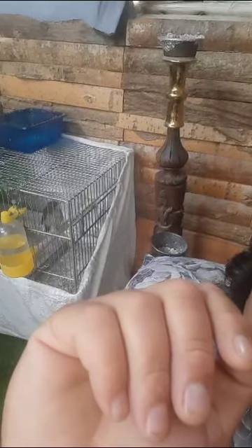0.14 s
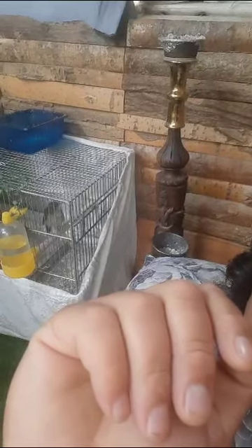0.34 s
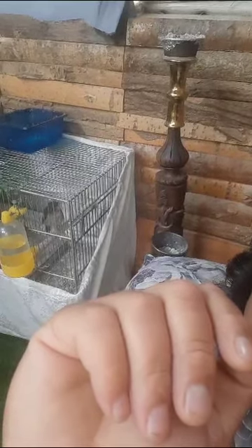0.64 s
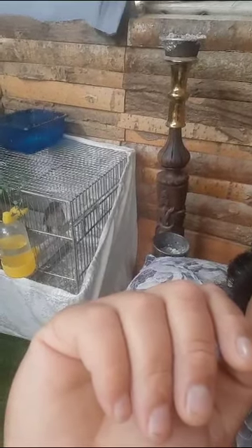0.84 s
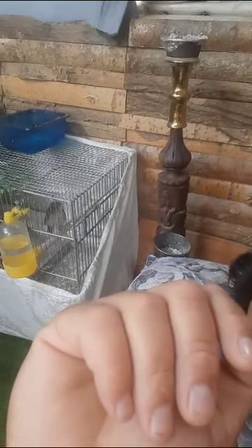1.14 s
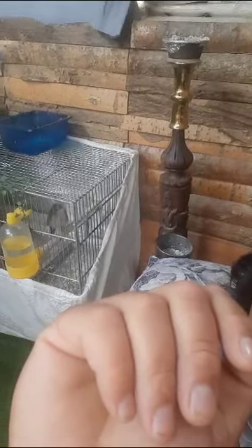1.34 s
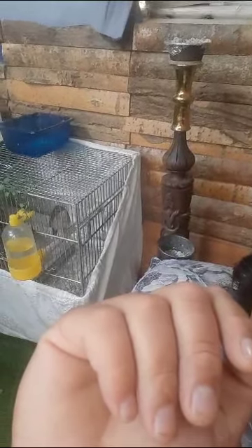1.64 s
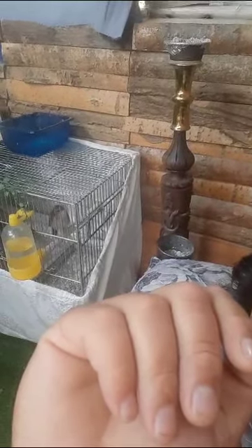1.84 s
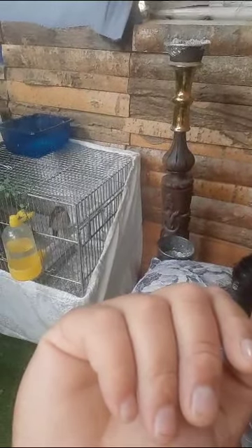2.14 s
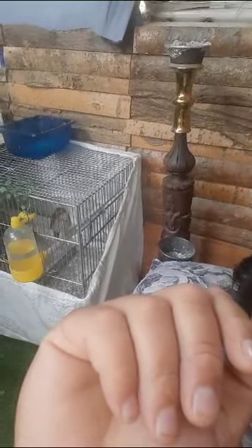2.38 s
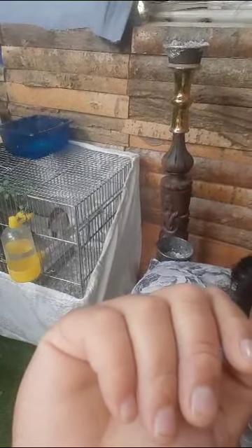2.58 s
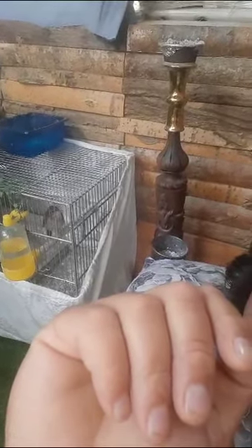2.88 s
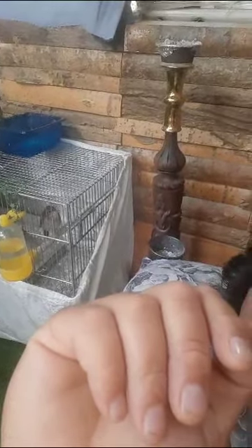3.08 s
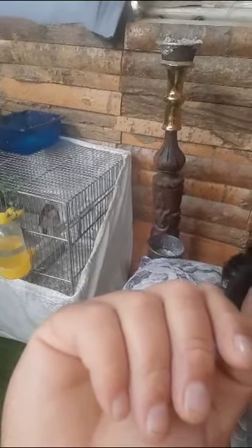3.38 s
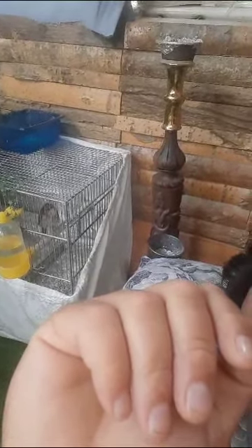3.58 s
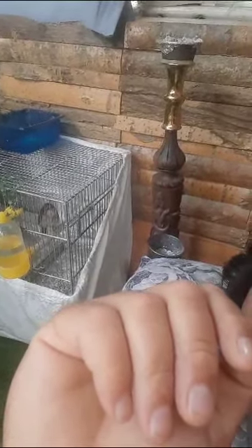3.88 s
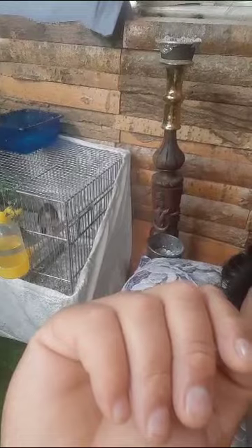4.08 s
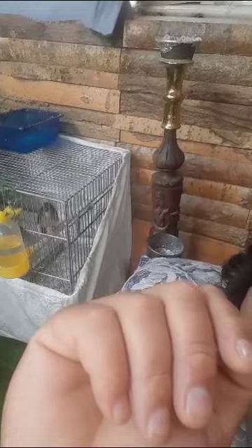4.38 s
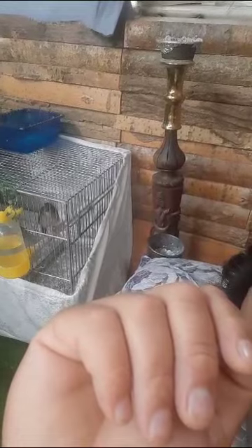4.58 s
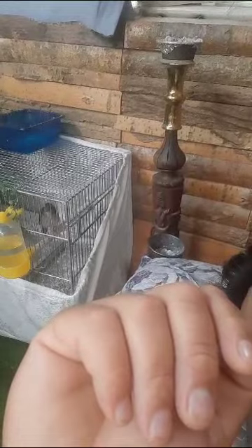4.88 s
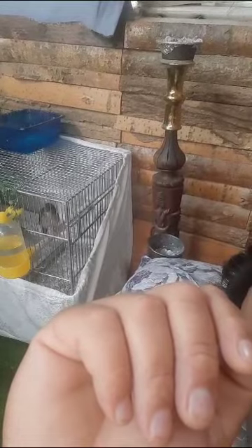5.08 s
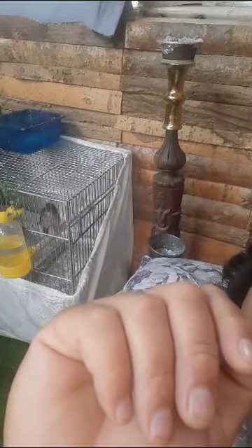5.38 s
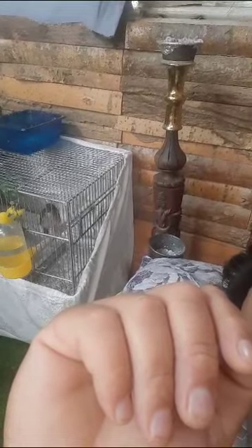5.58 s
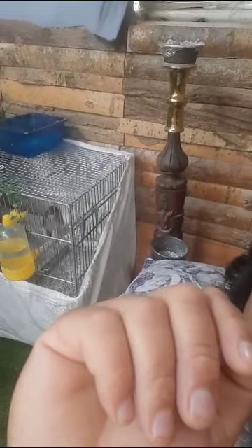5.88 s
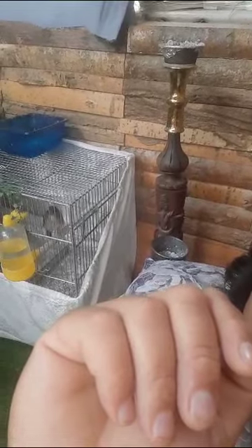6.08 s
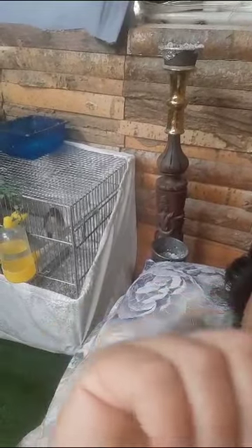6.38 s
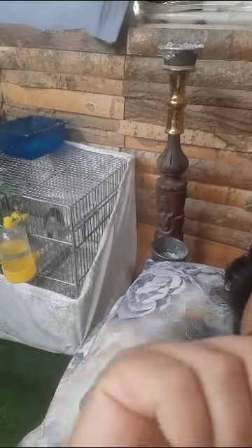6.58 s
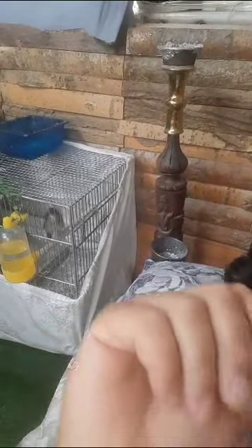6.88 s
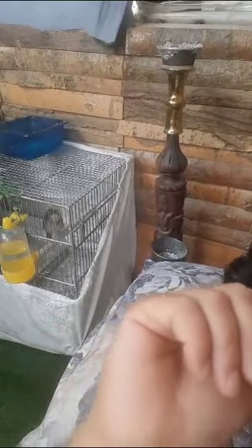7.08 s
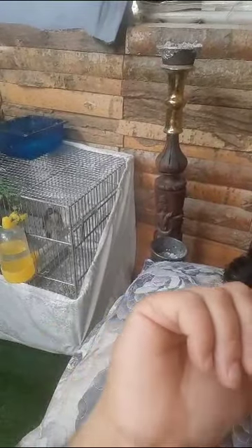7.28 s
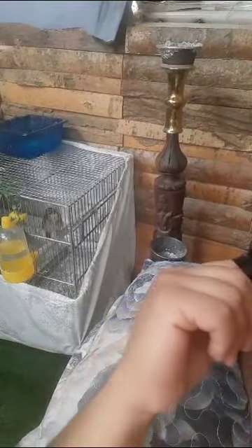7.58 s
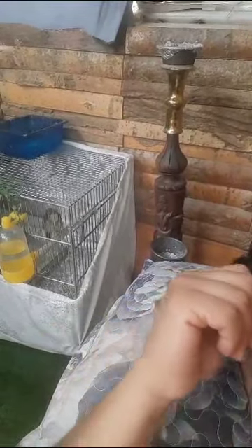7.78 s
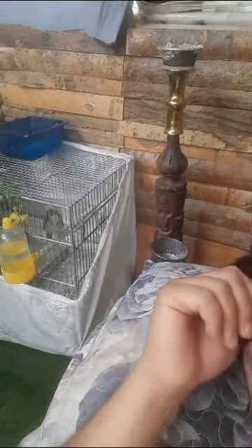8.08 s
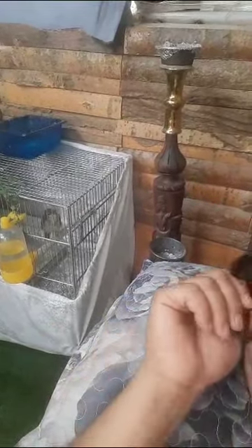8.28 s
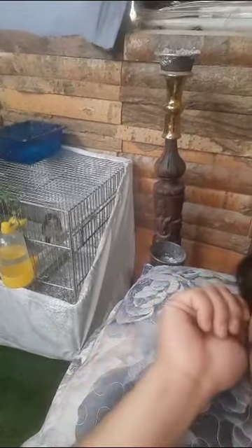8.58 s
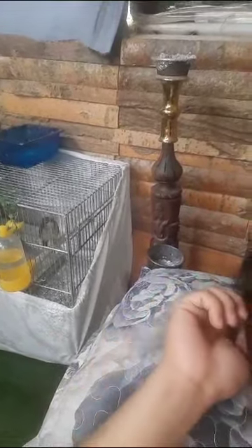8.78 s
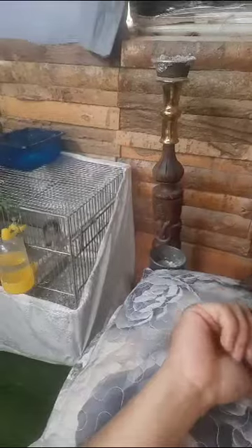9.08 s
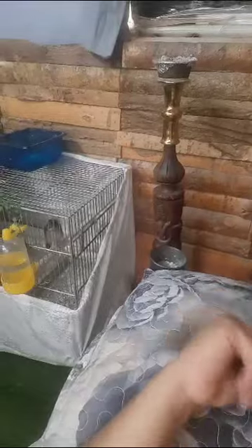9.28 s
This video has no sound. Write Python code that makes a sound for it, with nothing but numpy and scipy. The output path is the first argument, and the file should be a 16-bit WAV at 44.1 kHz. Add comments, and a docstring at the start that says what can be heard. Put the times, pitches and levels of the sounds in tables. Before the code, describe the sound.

One small caged bird sings close by in a wood-panelled room. Ten sharp, very high tsiks come first, then quick swoops and faint buzzes, alternating high and low see-saw whistles, and three thin sinking whistles. Loud swoops and rasping buzzes with downward flicks close the song, ending with one piercing slur. A few light cage ticks, soft air noise and a faint wavering hum lie beneath. Stereo handheld microphone, short reverberation.

```python
"""A caged songbird sings tsiks, swoops, slurs, see-saw notes, long whistles and buzzes.
Each note is a frequency-modulated near sine with overtones; a tsik sounds two such voices at once.
The cage ticks a few times in short bursts of band-passed noise.
Close reflections and a dense decaying tail, as of a small wood-panelled room, smear every note.
Behind it a distant machine hums in wavering sines, over soft shaped noise."""
import sys
import numpy as np
from scipy import signal
from scipy.fft import rfft, irfft
from scipy.io import wavfile

SR = 44100
rng = np.random.default_rng(int(sys.argv[2]) if len(sys.argv) > 2 else 0)


def log_audio(samples):
    """Write samples as a 16-bit WAV file to the path given in sys.argv[1]."""
    # one column per channel
    frames = np.atleast_2d(samples).T
    # limit to full scale, then quantise
    limited = np.clip(frames, -1, 1)
    pcm = np.round(limited * 32767).astype(np.int16)
    wavfile.write(sys.argv[1], SR, pcm)


N = 416304  # length in samples


def amp(db):
    """Level law: decibels to amplitude gain."""
    return 10 ** (np.asarray(db) / 20)


def evened(x):
    """Normalization: scales a signal to unit rms."""
    return x / np.sqrt(np.mean(x ** 2) + 1e-20)


def read(points, hz):
    """Spectral interpolation: reads a table on a log-frequency axis."""
    f, value = np.transpose(points)
    return np.interp(np.log(hz + 1), np.log(f + 1), value)


def add(mix, s, sound):
    """Superposition: sums a sound into the mix at time s, cutting what lies outside."""
    at = round(s * SR)
    sound = sound[max(-at, 0):]
    part = mix[max(at, 0):][:len(sound)]
    part += sound[:len(part)]


def drift(t, rate, count=20):
    """Random modulation: unit-rms sum of sines with chance frequencies from 0 to rate in Hz."""
    speed, phase = rng.random((2, count, 1))
    return evened(np.sin(2 * np.pi * (rate * speed * t + phase)).sum(0))


def progress(length):
    """Normalized time: time through a note in seconds, and from 0 to 1."""
    t = np.arange(0, length, 1 / SR)
    return t, t / length


def swell(u, peak, rise_db, fall_db, curve=1.57):
    """Amplitude envelope: relative level in dB that rises to 0 at the peak and sinks again."""
    peak = np.clip(peak, .05, .95)
    before = np.maximum(1 - u / peak, 0)
    after = np.maximum((u - peak) / (1 - peak), 0)
    return -rise_db * before ** curve - fall_db * after ** curve


def warble(t, rate, first_crest=0.0082, cusp=0.29, skew=0.26, stumble=.3):
    """Periodic modulation: second harmonics point the crests, round the troughs and hasten the rise."""
    swing = 2 * np.pi * rate * (t - first_crest) + stumble * drift(t, 40)
    return np.cos(swing) + cusp * np.cos(2 * swing) - skew * np.sin(2 * swing)


# strength of the whistle's overtones by where they fall, before effort and rolloff: (f/Hz, relative level/dB)
WHISTLE_OVERTONES = [(3000, -30), (5200, -40.5), (7500, -39), (11000, -39.5), (12800, -30.5),
                     (14500, -47.5), (16000, -46.5)]


def whistle(hz, db, edge, strain_db, rolloff=0.52, jitter=.002, bloom=0.17):
    """Harmonic source, one side of the syrinx: a near sine with fuzzy overtones scaled by level and strain."""
    t = np.arange(len(hz)) / SR
    phase = 2 * np.pi * np.cumsum(hz * (1 + jitter * drift(t, 330))) / SR
    unsteady = phase + .18 * drift(t, 550)  # radians
    effort = amp(bloom * (db + 19.0) + strain_db)  # bloom: overtone dB per dB of level
    overtones = 0
    for k in range(2, 9):
        strength = amp(read(WHISTLE_OVERTONES, k * hz)) / k ** rolloff
        below_nyquist = k * hz < SR / 2
        overtones = overtones + strength * np.sin(k * unsteady) * below_nyquist
    from_ends = np.minimum(t, t[-1] - t)
    gate = np.sin(np.pi / 2 * np.clip(from_ends / edge, 0, 1)) ** 2  # edge in s
    return np.sqrt(2) * amp(db) * gate * (np.sin(phase) + effort * overtones)


# sharp two-voiced tsiks; the levels are bases that each voice's envelope shapes:
# (plunge t/s, upper voice reference f/Hz, upper voice level/dB, plunge length t/s, plunge level/dB,
#  linger: over 1 hangs at the top and fades more)
TSIK_NOTES = [(.001, 14600, -31.5, 0.0096, -19.5, 1.24), (.151, 14500, -30.5, .012, -16, 1.16),
              (0.347, 15200, -25, 0.0081, -15.5, 2.1), (.53, 15500, -19, 0.0094, -11, 2.77),
              (.690, 15100, -22.5, 0.0099, -12.5, 1.75), (.84, 15300, -19, 0.00818, -8, 2.6),
              (1.003, 15300, -23.5, .009, -17, 1.76), (1.176, 14940, -26, 0.012, -27.5, 1.4),
              (1.352, 15300, -25.5, 0.014, -23, 2.1), (1.552, 14240, -36.5, 0.013, -24, 2.18)]


def tsiks(fade_db=7, rasp_db=2.5, bite=0.0037):
    """Two-source superposition: one voice arches very high as the other plunges, rasping, through the treble."""
    out = np.zeros(N)
    lead_s, top_hz, foot_hz = .023, 7616, 2920
    for s, crest_hz, crest_db, length, plunge_db, linger in TSIK_NOTES:
        t = np.arange(-lead_s, length, 1 / SR)
        knees = [-lead_s, -lead_s * .5, -lead_s * 0.22, length * 0.33, length]
        upper_hz = crest_hz * np.interp(t, knees, [.84, .99, 1.005, 0.9, 0.53])
        upper_db = crest_db + np.interp(t, knees, [-29, -7, 3.5, -1, -12])
        add(out, s - lead_s, whistle(upper_hz, upper_db, edge=0.0028, strain_db=4.5, jitter=0.01))

        t, u = progress(length)
        fall = u ** linger
        lower_hz = top_hz * (foot_hz / top_hz) ** fall
        lower_db = plunge_db - fade_db * fall * linger + rasp_db * drift(t, 1200)
        add(out, s, whistle(lower_hz, lower_db, edge=bite, strain_db=11, jitter=0.017))
    return out


# swoops, a fall, a pause and a rebound that levels off:
# (t/s, fall t/s, top f/Hz, foot f/Hz, bend: over 1 hangs at the top, fall peak level/dB,
#  pause t/s, rebound t/s, rebound target f/Hz, rebound peak level/dB)
SWOOP_NOTES = [(1.719, 0.048, 2600, 1376, 0.9, -28, 0.033, 0.038, 2054, -22.5),
               (1.966, .028, 5300, 2690, 0.44, -23.5, 0.016, 0.036, 2712, -29),
               (2.133, 0.045, 5890, 3070, 0.61, -23, 0.0055, 0.052, 2856, -31.5),
               (4.152, 0.02, 3300, 2180, 0.47, -19, .002, 0.053, 2347, -16),
               (4.248, 0.02, 3376, 2205, 0.45, -15.5, .002, 0.048, 2344, -15.5),
               (4.35, 0.028, 3083, 2014, .65, -17, 0.0029, 0.041, 2372, -21),
               (6.753, .050, 2265, 1397, 3.5, -14, 0.026, 0.067, 1819, -14),
               (6.99, 0.038, 3390, 1580, 0.92, -12, 0.0044, 0.057, 2438, -15),
               (7.193, 0.034, 3590, 1480, 1.34, -12.5, 0.014, 0.056, 2672, -12),
               (7.414, 0.037, 3247, 1696, 1.7, -12, 0.0082, 0.05, 2653, -13.5)]


def swoops(loudest_drop=0.29):
    """Frequency glide and exponential relaxation: the pitch plunges, pauses and springs toward a held note."""
    out = np.zeros(N)
    rebound_time_constant_s = .016
    for s, fall_s, top_hz, foot_hz, bend, fall_db, pause_s, rebound_s, rebound_hz, rebound_db in SWOOP_NOTES:
        t, u = progress(fall_s)
        hz = top_hz + (foot_hz - top_hz) * u ** bend
        peak = loudest_drop ** (1 / bend)  # loudest part of the way down
        level_db = fall_db + swell(u, peak, rise_db=7.5 + 5 * bend, fall_db=4)
        add(out, s, whistle(hz, level_db, edge=0.0032, strain_db=0, rolloff=.1, bloom=0.33))

        t, u = progress(rebound_s)
        hz = rebound_hz + (foot_hz - rebound_hz) * np.exp(-t / rebound_time_constant_s)
        level_db = rebound_db + swell(u, peak=.68, rise_db=9, fall_db=4.5)
        rebound = whistle(hz, level_db, edge=.005, strain_db=-3, rolloff=-.2, bloom=0.28)
        add(out, s + fall_s + pause_s, rebound)
    return out


# short downward flicks: (t/s, length t/s, top f/Hz, foot f/Hz, starting level/dB)
FLICK_NOTES = [(2.303, .026, 1750, 1070, -37), (7.736, 0.018, 3060, 1490, -14),
               (7.938, .021, 2780, 1236, -20), (8.159, .011, 2630, 1185, -23),
               (8.379, 0.013, 2665, 1350, -20)]


def flicks(bend=.9, fade_db=9):
    """Downward chirp: a quick, nearly straight drop in pitch that fades as it falls."""
    out = np.zeros(N)
    for s, length, top_hz, foot_hz, db in FLICK_NOTES:
        t, u = progress(length)
        hz = top_hz + (foot_hz - top_hz) * u ** bend
        add(out, s, whistle(hz, db - fade_db * u, edge=.002, strain_db=9))
    return out


# slurs that swell as they curl over and down: (t/s, length t/s, top f/Hz, end f/Hz, peak level/dB)
SLUR_NOTES = [(2.586, 0.076, 5650, 3730, -25.5), (8.457, 0.028, 7150, 6400, -8)]


def slurs(bend=2.0):
    """Curved chirp with a crescendo: a soft high start grows louder as it bends down."""
    out = np.zeros(N)
    for s, length, top_hz, end_hz, db in SLUR_NOTES:
        t, u = progress(length)
        hz = top_hz + (end_hz - top_hz) * u ** bend
        level_db = db + swell(u, peak=1.0, rise_db=33, fall_db=9.5)
        add(out, s, whistle(hz, level_db, edge=0.0041, strain_db=5))
    return out


# high see-saw notes, clean at first, then quivering, and low ones that quiver, then clear; columns of both:
# (t/s, length t/s, start f/Hz, end f/Hz, peak level/dB, peak as share of length, quiver scale f/Hz)
HIGH_SEESAW_NOTES = [(2.799, 0.13, 3175, 3560, -25.5, .75, 220), (3.187, 0.1, 3340, 3746, -24, .65, 240),
                     (3.582, .098, 3385, 3770, -17.5, .4, 160), (3.970, 0.11, 3266, 3756, -21.5, .45, 170)]
LOW_SEESAW_NOTES = [(2.993, 0.082, 1880, 1680, -30, .85, 450), (3.391, 0.086, 1612, 1803, -21, 0.52, 150),
                    (3.784, .068, 1590, 1690, -19.5, 1, 170)]


def seesaw(bend=1.7, quiver_growth=2.2, clearing=3, quiver_onset_s=0.026):
    """Frequency modulation of varying depth: high notes break into a quiver, alternate low ones lose theirs."""
    out = np.zeros(N)
    for rows, high in (HIGH_SEESAW_NOTES, True), (LOW_SEESAW_NOTES, False):
        for s, length, start_hz, end_hz, db, peak, depth_hz in rows:
            t, u = progress(length)
            if high:
                quiver = u ** quiver_growth
                shape_db = swell(u, peak, rise_db=25, fall_db=11.5)
            else:
                quiver = np.minimum(t / quiver_onset_s, 1) * (1 - u ** clearing)
                shape_db = swell(u, peak, rise_db=13, fall_db=2)
            glide_hz = start_hz + (end_hz - start_hz) * u ** bend
            hz = glide_hz + depth_hz * quiver * warble(t, rate=108, first_crest=.008)
            add(out, s, whistle(hz, db + shape_db, edge=0.0038, strain_db=2, rolloff=0.69))
    return out


# long whistles that sink and swell, each a curve before vibrato and flutter: (t/s, f/Hz, level/dB)
LONG_WHISTLE_CURVES = [
    [(5.09, 6050, -55.5), (5.21, 5430, -46), (5.30, 4930, -33), (5.36, 5050, -35), (5.405, 5260, -46.5)],
    [(5.65, 6005, -60), (5.82, 5460, -42), (5.885, 5473, -32), (5.962, 5358, -26.5)],
    [(6.233, 6460, -58.5), (6.32, 5493, -50.5), (6.48, 5070, -27), (6.575, 4815, -23), (6.61, 4630, -17),
     (6.655, 4460, -20.5), (6.672, 5900, -42)],
]


def long_whistles(vibrato_per_s=39, vibrato_hz=115, widen_db=0.97, bead_db=2.5, flutter_db=3.0, wander_hz=35):
    """Joint frequency and amplitude modulation: a vibrato widens with loudness and beads the level."""
    out = np.zeros(N)
    for curve in LONG_WHISTLE_CURVES:
        times, pitches, levels = np.transpose(curve)
        t, u = progress(times[-1] - times[0])
        hz = np.interp(times[0] + t, times, pitches)
        db = np.interp(times[0] + t, times, levels)
        vibrato = warble(t, vibrato_per_s, stumble=0.85)
        width_hz = vibrato_hz * amp(widen_db * (db - db.max()))
        hz = hz + width_hz * vibrato + wander_hz * drift(t, 21.92)
        level_db = db + bead_db * vibrato + flutter_db * drift(t, 70)
        add(out, times[0], whistle(hz, level_db, edge=0.0059, strain_db=15.5, rolloff=0.93, bloom=-.05))
    return out


# buzzes, from soft lisps to loud rasps; the level is a base that envelope and strokes shape:
# (t/s, length t/s, start f/Hz, end f/Hz, level/dB, initial warble scale f/Hz, warble rate f/Hz)
BUZZ_NOTES = [(1.93, 0.037, 4550, 6040, -36, 600, 71), (1.933, 0.02, 7440, 6850, -43, 500, 94),
              (2.115, 0.05, 6400, 6920, -39, 200, 112), (2.326, 0.056, 2510, 2710, -54.5, 250, 89),
              (2.34, 0.053, 1297, 1370, -47, 100, 121), (2.508, 0.058, 3300, 4210, -38, 333, 67.5),
              (4.488, 0.051, 6010, 6760, -40.5, 250, 112), (4.493, 0.028, 4200, 4260, -43.5, 1400, 149),
              (7.584, 0.091, 3717, 3766, -15, 418.5, 74), (7.791, .076, 3873, 3720, -12, 634, 101),
              (8.006, 0.063, 3930, 3956, -13, 660, 68), (8.224, 0.08, 3858, 3750, -21.5, 690, 69)]


def buzzes(settle=0.81, detune_db=25, stroke_db=1.5, bend=2.5):
    """Fast frequency modulation past a resonance: a narrowing warble, with the level raised on downstrokes."""
    out = np.zeros(N)
    for s, length, start_hz, end_hz, db, depth_hz, rate in BUZZ_NOTES:
        t, u = progress(length)
        hz = start_hz + (end_hz - start_hz) * u ** bend
        swing = warble(t, rate, first_crest=.008, skew=0.29)
        warble_hz = depth_hz * (1 - settle * u) * swing
        off_throat_db = detune_db * np.maximum(warble_hz, 0) / hz  # crests overshoot the throat's resonance
        upstroke_db = stroke_db * evened(np.gradient(swing))
        level_db = db + swell(u, peak=0.38, rise_db=10, fall_db=3) - off_throat_db - upstroke_db
        add(out, s, whistle(hz + warble_hz, level_db, edge=0.0029, strain_db=12, rolloff=0.93))
    return out


# light ticks of the cage: (t/s, level/dB before the decay, band centre f/Hz)
CAGE_TICKS = [(2.042, -35.5, 3240), (6.286, -57, 3000), (6.340, -51, 2700), (7.556, -40.5, 2960),
              (8.557, -48.5, 1200), (9.379, -53.5, 4000)]


def ticks(t60=0.062):
    """Impulsive noise with exponential decay: short, broad snaps of wire and perch."""
    out, t = np.zeros(N), np.arange(SR // 10) / SR
    for s, db, hz in CAGE_TICKS:
        b, a = signal.butter(1, [hz / 2, hz * 2], "band", fs=SR)
        snap = signal.lfilter(b, a, rng.standard_normal(len(t)))
        add(out, s, amp(db - 60 * t / t60) * evened(snap))
    return out


# reflections from nearby surfaces: (left delay t/s, right delay t/s, level/dB before a common trim)
WALL_REFLECTIONS = [(.0012, 0.001284, -10.5), (.0026, .00267, -14.5), (.0047, .0041, -13),
                    (.0074, .0081, -11), (.0096, .0102, -7.5), (0.0136, 0.016, -3.5)]
# reverberation time of the tail: (f/Hz, 60 dB decay t/s)
ROOM_DECAY = [(500, 0.11), (1800, 0.16), (3500, 0.19), (7000, 0.17), (15000, 0.13)]


def room(x, right_db=-0.43, build=0.013):
    """Impulse-response convolution: direct sound, close reflections and a short dense tail at each microphone."""
    direct_db, walls_db, tail_db = -4.5, -3.5, -5
    left_lag_s = .00032
    size = SR // 2
    signs = rng.choice([-1., 1.], (2, size))
    taps = signs * (rng.random((2, size)) < 4000 / SR)  # about 4000 echoes per s
    hz, t, z = signal.stft(taps, SR, nperseg=128)
    decay = amp(-60 * t / read(ROOM_DECAY, hz)[:, None])
    tail = signal.istft(z * decay * np.minimum(t / build, 1), SR, nperseg=128)[1]
    response = amp(tail_db) * tail / np.linalg.norm(tail, axis=1, keepdims=True)
    response[[0, 1], [round(left_lag_s * SR), 0]] += amp(direct_db)
    for left, right, db in WALL_REFLECTIONS:
        response[[0, 1], [round(left * SR), round(right * SR)]] += amp(db + walls_db)
    return signal.fftconvolve(x[None], response, axes=1)[:, :N] * amp([[0], [right_db]])


# hum of a distant machine: (f/Hz, rms waver f/Hz, base level/dB, full change/dB as the hum shifts)
HUM_TONES = [(93, 2, -57.5, -3.5), (146, 10, -63.5, 9.5), (298.8, 11, -56, -6.5), (327.4, 11, -59.5, -0.5),
             (428, 3.2, -72, 1), (504.6, 6, -64, -4), (591.5, 4.4, -61, -3), (674, 6.7, -70.5, 0.5),
             (925, 13, -68, -6)]
# course of the hum's shift: (t/s, share of the full change)
HUM_SHIFT_COURSE = [(7.9, 0.063), (8.6, 0.95)]


def hum(throb_db=3):
    """Additive synthesis with random modulation: low tones waver in pitch and level."""
    t, slow = np.arange(N) / SR, np.linspace(0, N / SR, 1000)
    shift = np.interp(slow, *np.transpose(HUM_SHIFT_COURSE))
    out = np.zeros((2, N))
    for hz, waver_hz, db, change_db in HUM_TONES:
        pitch = np.interp(t, slow, hz + waver_hz * drift(slow, 12))
        level = np.interp(t, slow, amp(db + change_db * shift + throb_db * drift(slow, 6)))
        lean = amp(read(STEREO_TILT, hz) * np.array([[.5], [-.5]]))
        out += lean * np.sqrt(2) * level * np.sin(2 * np.pi * np.cumsum(pitch) / SR)
    return out


# left-right correlation of the noise: (f/Hz, likeness from 0 to 1)
STEREO_LIKENESS = [(30, 0.8), (200, 0.94), (400, 0.27), (700, 0.043), (2000, 0.038), (15000, 0.07)]
# stereo lean of noise and hum: (f/Hz, left minus right level/dB)
STEREO_TILT = [(60, -2.5), (110, 5.5), (200, -4.5), (380, -2.5), (700, 4), (1290, 0.5), (2380, 0.5),
               (4400, -3.5), (8120, -6), (15000, 1)]


def stereo_noise(gain):
    """Partial coherence: shaped noise, nearly mono in the bass, leans left or right with the room's modes."""
    a, b = rfft(rng.standard_normal((2, N)))
    hz = np.fft.rfftfreq(N, 1 / SR)
    alike = np.clip(read(STEREO_LIKENESS, hz), -1, 1)
    lean = amp(read(STEREO_TILT, hz) / 2)
    left = a * lean
    right = (alike * a + np.sqrt(1 - alike ** 2) * b) / lean
    return evened(irfft(np.array([left, right]) * gain, N))


# spectrum of the soft room noise: (f/Hz, relative level/dB per Hz)
AIR_SPECTRUM = [(20, -22), (80, -12), (120, -16.5), (160, -13), (260, -17.5), (480, -16.5), (650, -17.5),
                (800, -26.5), (1300, -33.5), (1750, -33), (2500, -46), (4250, -52), (4520, -38.5),
                (4800, -48.5), (5700, -48), (6700, -43.5), (8100, -43), (8800, -50.5), (16000, -53)]
# course of the room noise: (t/s, level/dB before a common trim)
AIR_LEVEL = [(0, -47.5), (1.05, -48), (3.8, -45.5), (4.7, -49.5), (5.6, -50), (5.902, -47), (6.8, -45),
             (8.6, -52), (9.44, -50.5)]


def background(air_db=-2):
    """Spectrally shaped noise: soft room noise slowly swells and sinks."""
    level_db = np.interp(np.arange(N) / SR, *np.transpose(AIR_LEVEL))
    spectrum = amp(read(AIR_SPECTRUM, np.fft.rfftfreq(N, 1 / SR)))
    return amp(level_db + air_db) * stereo_noise(spectrum)


def scene():
    """Linear superposition: bird and cage in the room, over the noise and hum."""
    song = tsiks() + swoops() + flicks() + slurs() + seesaw() + buzzes() + long_whistles()
    return room(song + ticks()) + background() + hum()


# microphone response with a treble notch: (f/Hz, level/dB)
MICROPHONE_RESPONSE = [(20, -1.5), (7200, 1.5), (8300, 0.5), (9300, -21.5), (10300, -5), (12500, -5),
                       (15200, -0.5), (16500, -8.5)]


def record(dry):
    """Linear filtering: the microphone's response, then a low-pass band limit."""
    gain = amp(read(MICROPHONE_RESPONSE, np.fft.rfftfreq(2 * N, 1 / SR)))
    coloured = irfft(rfft(dry, 2 * N) * gain)[:, :N]
    low_pass = signal.firwin(511, 16050, window=("kaiser", 9), fs=SR)  # cutoff in Hz
    return signal.oaconvolve(coloured, low_pass[None], "same")


dry = scene()
out = record(dry)
log_audio(out)
```